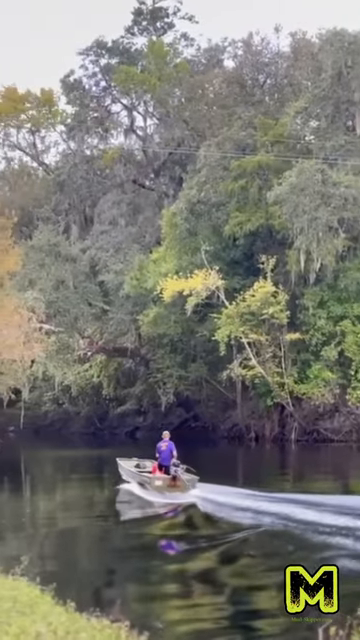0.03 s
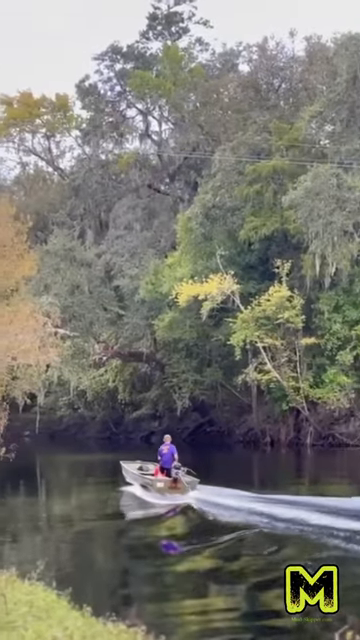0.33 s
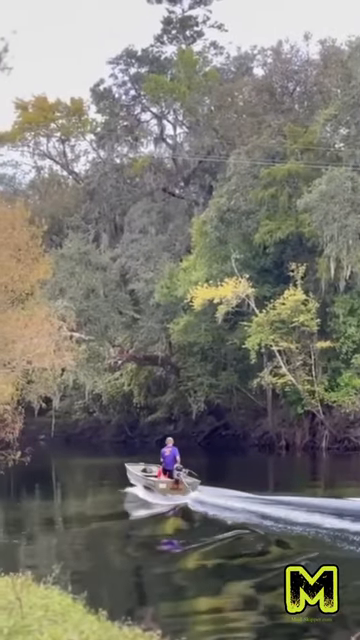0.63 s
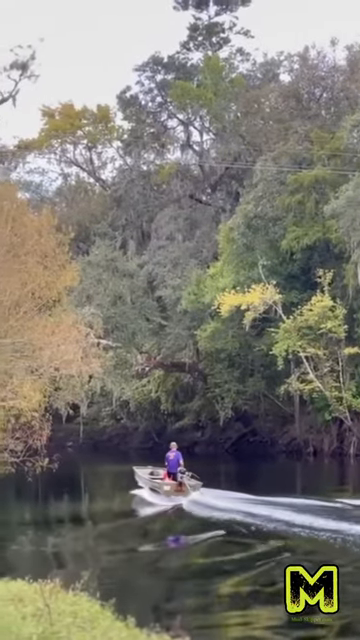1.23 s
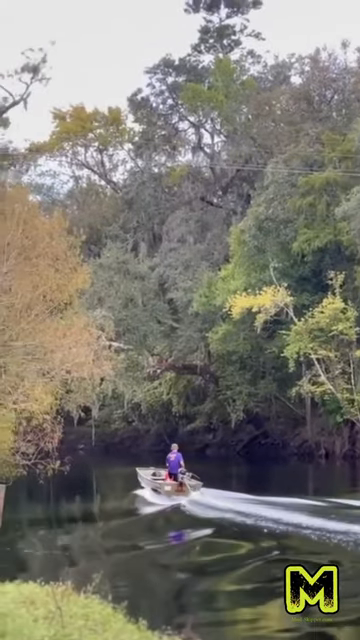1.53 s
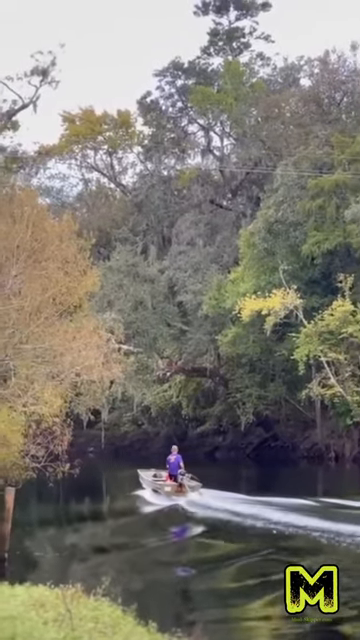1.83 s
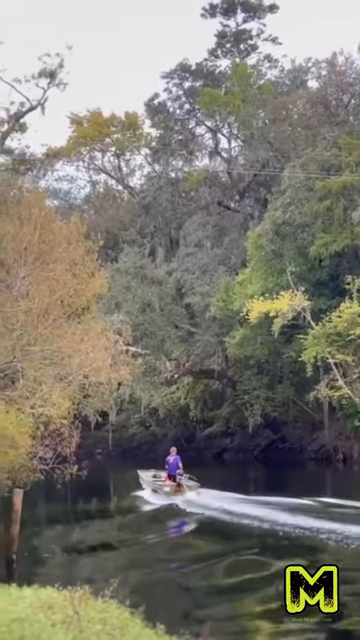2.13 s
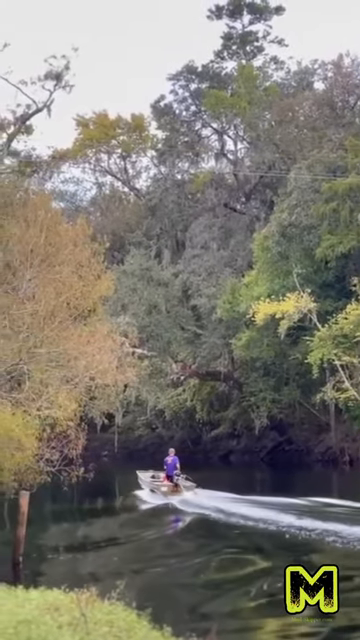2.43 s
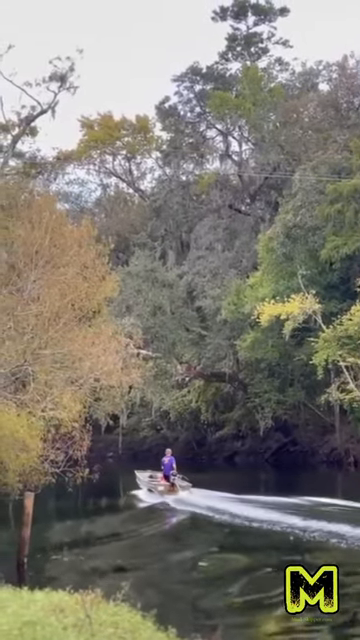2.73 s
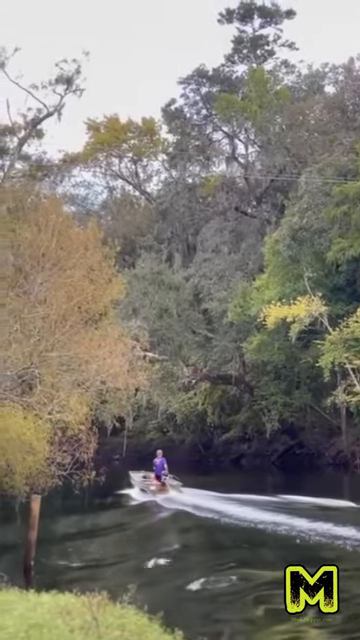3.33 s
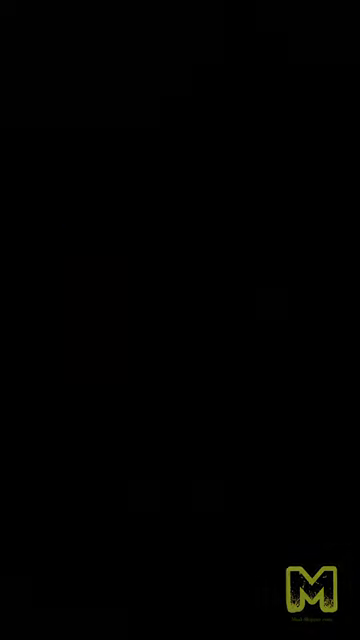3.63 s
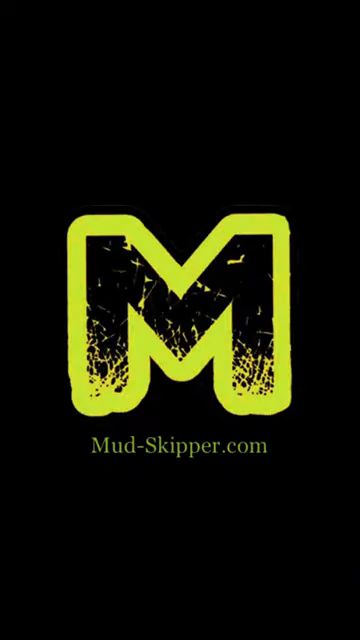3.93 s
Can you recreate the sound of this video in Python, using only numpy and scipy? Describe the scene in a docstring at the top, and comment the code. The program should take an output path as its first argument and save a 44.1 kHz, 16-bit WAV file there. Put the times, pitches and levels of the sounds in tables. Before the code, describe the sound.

A small boat motor chugs steadily with a deep thump over churning water.

```python
"""From the start, a small boat's single-cylinder four-stroke motor chugs along a tree-lined river.
Each firing lets out a sharp crack of gas, rings exhaust and hull with a low thump and trails a puff.
Half a cycle later the intake hisses, then the bank echoes crack and hiss over the wash of the wake.
The throttle holds steady; crack, hiss and wash ease off as the boat draws away, and all fades out."""
import sys
import numpy as np
from scipy import signal
from scipy.fft import rfft, irfft
from scipy.io import wavfile
from scipy.ndimage import uniform_filter1d

SR = 44100
rng = np.random.default_rng(int(sys.argv[2]) if len(sys.argv) > 2 else 0)


def dump(signal):
    """Clip the signal to [-1, 1] and save it as 16-bit WAV at the path in sys.argv[1]."""
    limited = np.clip(np.atleast_2d(signal).T, -1, 1)
    pcm = np.round(limited * 32767).astype(np.int16)
    wavfile.write(sys.argv[1], SR, pcm)


N = 176400

# wake and steady churning (frequency [Hz], relative density [dB])
WASH_SPECTRUM = [(25, 3.5), (100, 9.5), (400, 4.5), (600, 3.5), (850, -0.5), (1250, 4), (1450, -1),
                 (1750, 0), (2100, -3), (2450, -4), (2900, -3), (3900, -7.5), (5300, -6.5), (6200, -9.5),
                 (7500, -8.5), (9200, -11), (10500, -32)]
# hiss of the intake stroke (frequency [Hz], relative density [dB])
INTAKE_SPECTRUM = [(300, 13.5), (550, 3), (900, -4.5), (1300, -14.5), (3000, -22), (4400, -13),
                   (5300, -1.5), (6200, -7), (7500, -2), (10000, -13.5)]
# turbulent exhaust flow after each firing (frequency [Hz], relative density [dB])
PUFF_SPECTRUM = [(25, -24.5), (55, -7.5), (90, -7), (150, 1), (245, -6), (290, -11.5), (360, -13),
                 (450, -24.5), (700, -28), (1500, -50)]
# crack of escaping gas (frequency [Hz], relative density [dB])
CRACK_SPECTRUM = [(250, -9), (450, -2), (720, -2), (930, -1), (1200, 3.5), (1420, -2), (1650, 0), (2100, 3),
                  (2420, -6), (2680, -1.5), (3100, -6.5), (4100, -4.5), (4750, -3.5), (6500, -2.5),
                  (7200, -2.5), (7700, -7.5), (9200, -8), (10500, -26)]
# narrow dips and peaks in the treble (frequency [Hz], width [Hz], gain [dB])
TREBLE_EQ = [(1026, 33, -8.5), (1470, 64, -8), (1510, 120, 4), (4780, 110, 1.5), (8500, 160, 4)]
# deep resonances of exhaust and hull (frequency [Hz], width [Hz], relative level [dB])
BODY_MODES = [(55.4, 17, -34), (107.34, 7, -17.5), (147.76, 10.1, -14.5), (194, 22.3, -21.5),
              (215.7, 52.8, -28), (239.2, 23.5, -21.5)]
# lighter rings of pipe and panels (frequency [Hz], width [Hz], relative level [dB])
PANEL_MODES = [(263, 11, -36), (338, 8, -38.5), (373, 35, -46.5), (415, 4, -39), (435.4, 7, -42.5),
               (494, 7.5, -50.5), (537.7, 8.3, -41.5), (692, 11, -48)]
# motor speed (time [s], firing rate [Hz])
FIRING_RATE = [(0.0, 20.448), (0.35, 20.64), (0.9, 20.645), (1.3, 20.585), (1.7, 20.751), (2.1, 20.785),
               (2.55, 20.539), (3.0, 20.674), (3.4, 20.648), (3.85, 20.132)]
# firings that stand out as hard or weak (time [s], crack accent [dB], thump accent [dB])
ACCENTS = [(.219, -2, -1), (.316, 2, 0.5), (.413, -0.5, -1), (.461, 1.5, 0), (.51, 1.5, 1), (.558, 2, -0.5),
           (.655, 1.5, 0.5), (.8, 1.9, 0), (.994, 2, 1), (1.091, -3.5, -0.5), (1.139, 0, 0.5),
           (1.382, 2.3, 0.5), (1.479, -3, -2.2), (1.673, -3, -1), (1.914, -0.5, 2.5), (2.058, 2.7, 0),
           (2.396, 0.7, -0.6), (2.493, 2.5, 2), (2.59, 2.2, 0.7), (2.833, -3, -0.8), (2.882, 2.5, -0.5),
           (2.979, -2.4, -1), (3.075, -0.5, -1.6), (3.172, 1, 1), (3.317, -1, -2.7)]


def undb(db):
    """Decibels to gain."""
    return 10 ** (np.asarray(db) / 20)


def level(x, db):
    """Scale to an rms level."""
    return x * undb(db) / np.sqrt(np.mean(x ** 2))


def noise(points):
    """Noise of unit rms shaped by (frequency [Hz], density [dB]) points, rolled off at both ends."""
    hz, db = np.array(points, float).T
    f = np.maximum(np.arange(N // 2 + 1) * SR / N, 1)
    contour = undb(np.interp(np.log(f), np.log(hz), db))
    gain = contour / (1 + (f / hz[-1]) ** 8) / (1 + (hz[0] / 2 / f) ** 2)
    return level(irfft(rfft(rng.standard_normal(N)) * gain, N), 0)


def bands(x, count=18):
    """Split into overlapping bands that add up to the whole: (centre [Hz], band) pairs."""
    centres = np.geomspace(500, 9000, count)
    f = np.arange(N // 2 + 1) * SR / N
    spectrum = rfft(x)
    return [(hz, irfft(spectrum * np.interp(f, centres, share), N))
            for hz, share in zip(centres, np.eye(count))]


def wobble(rate_hz):
    """Smooth random modulation with a spread near 1."""
    hold = int(SR / rate_hz)
    steps = np.repeat(rng.standard_normal(N // hold + 1), hold)
    return 1.3 * uniform_filter1d(uniform_filter1d(steps, hold), hold)[:N]


def bursts(times, sizes, rise_s, decay_s):
    """Envelope of unit rms: a quick swell up to each time, then an exponential decay."""
    span = np.arange(-SR // 50, SR // 7)
    age = span / SR
    shape = np.where(age < 0, np.exp(-(age / rise_s) ** 2 / 2), np.exp(-np.abs(age) / decay_s))
    power = np.zeros(N)
    for at, size in zip(times, sizes):
        i = span + int(at * SR)
        inside = (i >= 0) & (i < N)
        power[i[inside]] += (size * shape[inside]) ** 2
    return level(np.sqrt(power), 0)


def resonate(x, hz, width_hz):
    """One resonance, with unit gain at its peak."""
    return signal.lfilter(*signal.iirpeak(hz, hz / width_hz, fs=SR), x)


def ring(pulses, modes):
    """A set of struck resonances; neighbours swing in opposite directions."""
    return sum(-(-1) ** k * undb(db) * resonate(pulses, hz, width)
               for k, (hz, width, db) in enumerate(modes))


def colour(x):
    """Carve narrow dips and peaks into the treble."""
    for hz, width, db in TREBLE_EQ:
        x = x + (undb(db) - 1) * resonate(x, hz, width)
    return x


def wake_wash(flicker_db=1.24, sputter_db=2):
    """The bed: churned water behind the boat, each band flickering and sputtering a little."""
    water = sum(band * undb(flicker_db * wobble(rate_hz=14) + sputter_db * wobble(rate_hz=90))
                for _, band in bands(noise(WASH_SPECTRUM)))
    return level(water, db=-33.5)


def bank_echo(x, swell_s=0.06, t60_s=0.8, send_db=-12.5):
    """Trees along the river scatter the sound back as a diffuse tail."""
    age = np.arange(SR) / SR
    swell = np.minimum(age / swell_s, 1) ** 2
    tail = rng.standard_normal(SR) * undb(-60 * age / t60_s) * swell
    return undb(send_db) * signal.fftconvolve(x, tail / np.sqrt(np.sum(tail ** 2)))[:N]


def intake_hiss(times, lag_s=0.023, scatter_db=3.5, drift_db=3):
    """The intake stroke draws air: a soft hiss between the cracks, with a faint whistle in it."""
    sizes = undb(scatter_db * rng.standard_normal(len(times)))
    stroke = bursts(times + lag_s, sizes, rise_s=0.0026, decay_s=0.011)
    whistle = resonate(rng.standard_normal(N) * stroke, hz=5420, width_hz=200)
    hiss = noise(INTAKE_SPECTRUM) * stroke
    whistle *= undb(drift_db * wobble(rate_hz=2))
    return level(hiss, db=-44) + level(whistle, db=-53.5)


def exhaust_puff(times, sizes, lag_s=0.0052):
    """Low, breathy turbulence rides on each exhaust stroke."""
    flow = bursts(times + lag_s, sizes, rise_s=0.0072, decay_s=0.087)
    return level(noise(PUFF_SPECTRUM) * flow, db=-26.5)


def exhaust_crack(times, accent_db, split_hz=2416, band_scatter_db=2):
    """The exhaust valve opens: a few milliseconds of rushing gas, differently coloured each time."""
    gas = np.zeros(N)
    for hz, band in bands(noise(CRACK_SPECTRUM)):
        if hz < split_hz:  # the lower part comes later and rings longer
            lag_s, rise_s, decay_s, follow = 0.0004, 0.0016, 0.0066, 0.78
        else:  # the top follows accents more, so hard firings are brighter
            lag_s, rise_s, decay_s, follow = -0.0004, 0.0013, 0.0043, 1.04
        sizes = undb(follow * accent_db + band_scatter_db * rng.standard_normal(len(times)))
        gas += band * bursts(times + lag_s, sizes, rise_s, decay_s)
    return level(gas, db=-33)


def hull_thump(times, sizes, thud_db=-24, thud_lag_s=0.02, panel_lag_s=0.002, low_cut_hz=41.5):
    """The weight of the motor: pressure pulses ring exhaust, hull and panels."""
    preroll = SR // 2  # holds five earlier firings, so the hull is already ringing at the start
    earlier = times[0] - (times[1] - times[0]) * np.arange(1, 6)
    pulses = np.zeros(N + 2 * preroll)
    pulses[(earlier * SR).astype(int) + preroll] = 1
    pulses[(times * SR).astype(int) + preroll] = sizes
    thuds = undb(thud_db) * rng.standard_normal(len(times))  # uneven push of the intake stroke
    pulses[((times + thud_lag_s) * SR).astype(int) + preroll] += thuds
    body = ring(pulses, BODY_MODES)
    panels = ring(np.roll(pulses, int(panel_lag_s * SR)), PANEL_MODES)
    low_cut = signal.butter(2, low_cut_hz, "high", fs=SR, output="sos")
    thump = signal.sosfilt(low_cut, body + panels)[preroll:preroll + N]
    return level(thump, db=-16.5)


def motor_firings(t, first_s=0.024, jitter_s=0.00015, crack_scatter_db=0.68, thump_scatter_db=0.53):
    """One slightly uneven firing per two crank turns: (time [s], crack accent [dB], thump gain)."""
    cycles = np.cumsum(np.interp(t, *np.array(FIRING_RATE).T)) / SR
    cycles -= np.interp(first_s, t, cycles)
    times = np.interp(np.arange(int(cycles[-1])), cycles, t)
    scatter = rng.standard_normal((len(times), 3)) * [jitter_s, crack_scatter_db, thump_scatter_db]
    slip_s, crack_db, thump_db = scatter.T
    for at, crack_accent, thump_accent in ACCENTS:
        nearest = np.argmin(np.abs(times - at))
        crack_db[nearest], thump_db[nearest] = crack_accent, thump_accent
    return times + slip_s, crack_db, undb(thump_db)


def scene(recede_db_per_s=0.47):
    """Mono mix: thump and puff hold their level while the brighter layers slowly recede."""
    t = np.arange(N) / SR
    times, crack_db, sizes = motor_firings(t)
    gas = exhaust_crack(times, crack_db) + intake_hiss(times)
    recede = undb(-recede_db_per_s * (t - t.mean()))
    bright = colour(gas + bank_echo(gas) + wake_wash()) * recede
    low_end = hull_thump(times, sizes) + exhaust_puff(times, sizes)
    return (low_end + bright)[None]


def record(dry, fade_start_s=3.34, fade_end_s=3.941, stop_s=3.875, top_hz=10000):
    """A near-linear fade-out, gated shut just before its end, and a steep high cut."""
    t = np.arange(N) / SR
    fade = np.clip((fade_end_s - t) / (fade_end_s - fade_start_s), 0, 1) ** 1.007
    gate = np.clip((stop_s - t) / 0.003, 0, 1)
    high_cut = signal.firwin(161, top_hz, window=("kaiser", 8), fs=SR)
    return signal.fftconvolve(dry * fade * gate, high_cut[None], "same")


dry = scene()
out = record(dry)
dump(out)
```